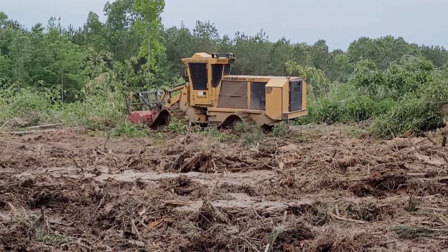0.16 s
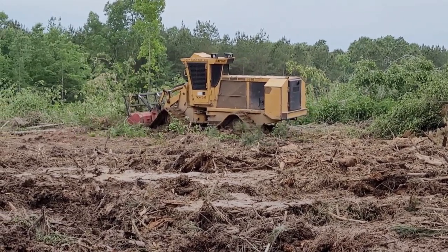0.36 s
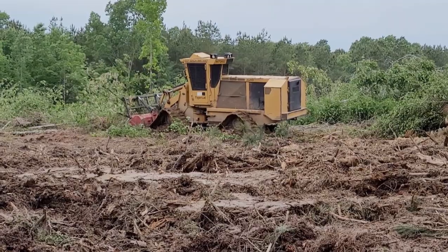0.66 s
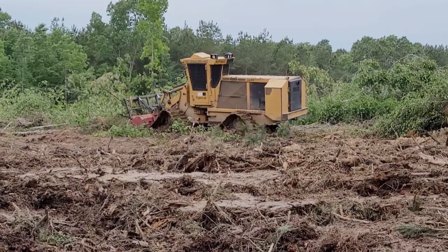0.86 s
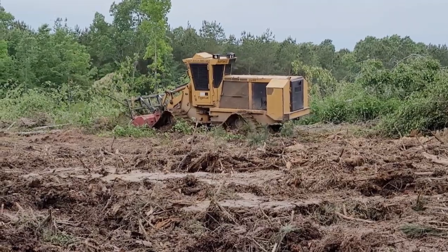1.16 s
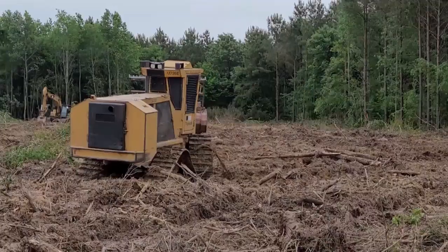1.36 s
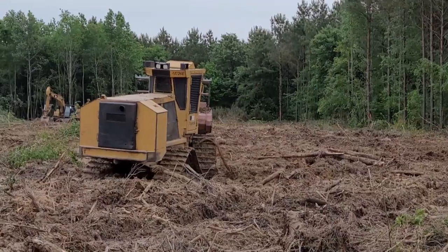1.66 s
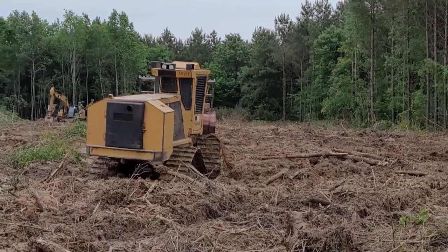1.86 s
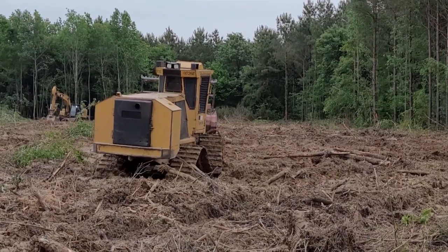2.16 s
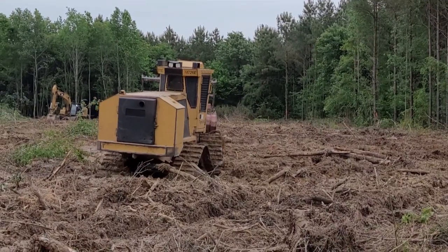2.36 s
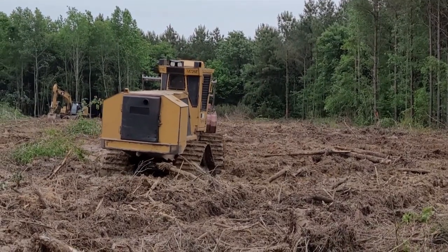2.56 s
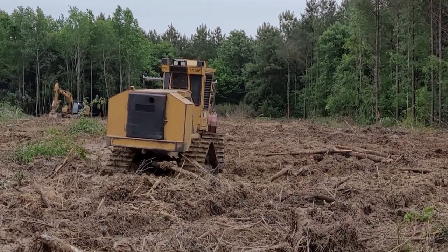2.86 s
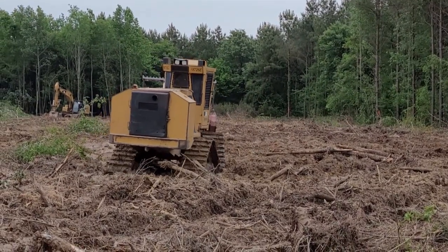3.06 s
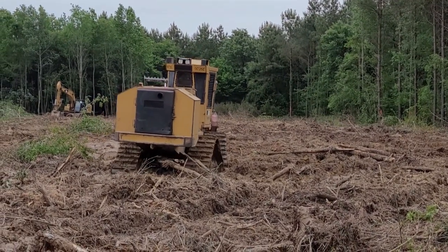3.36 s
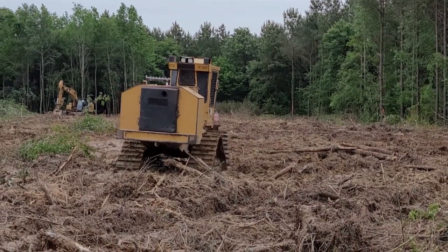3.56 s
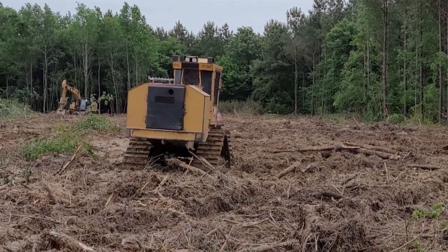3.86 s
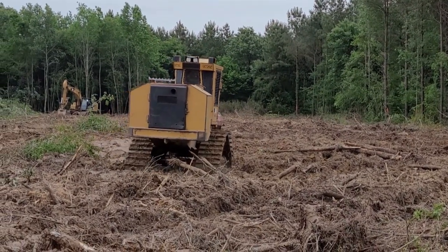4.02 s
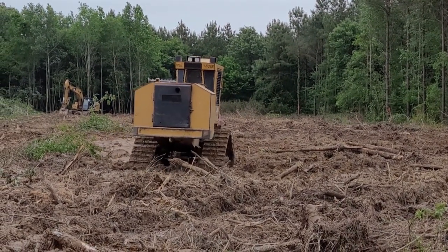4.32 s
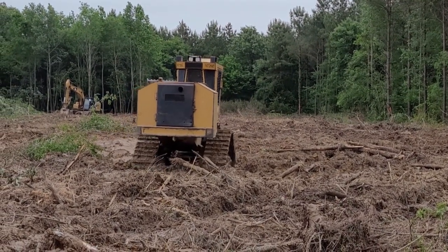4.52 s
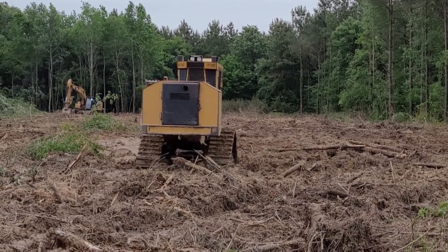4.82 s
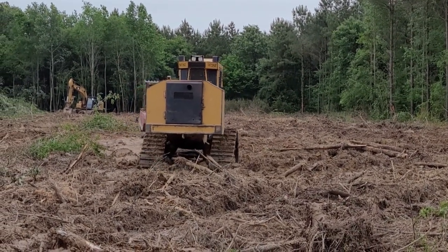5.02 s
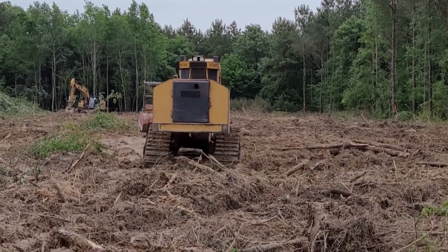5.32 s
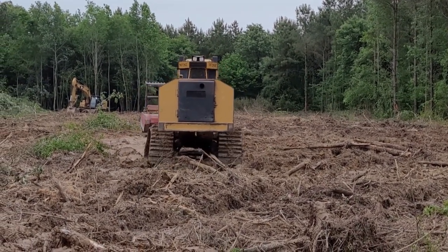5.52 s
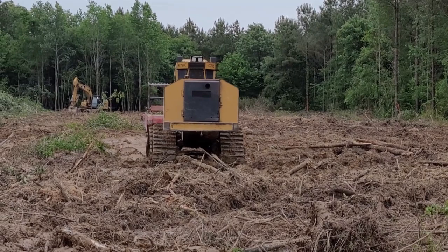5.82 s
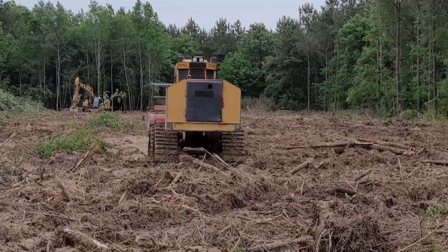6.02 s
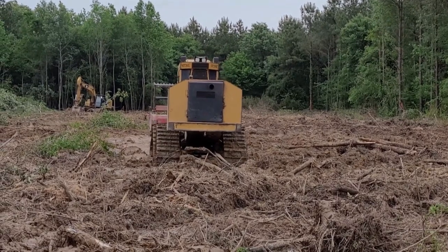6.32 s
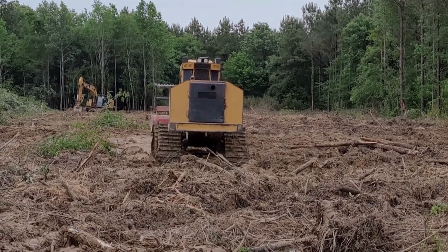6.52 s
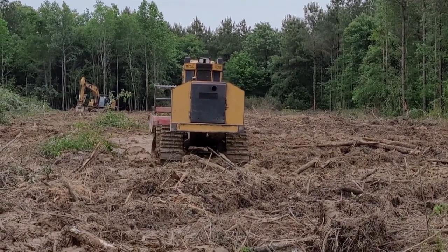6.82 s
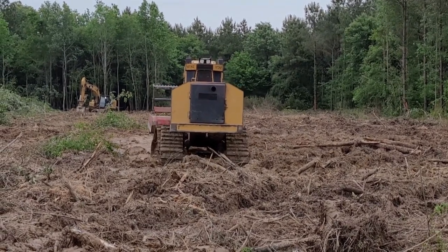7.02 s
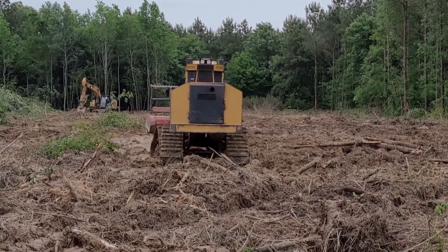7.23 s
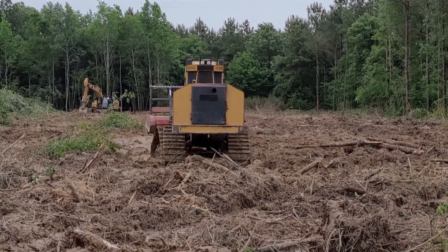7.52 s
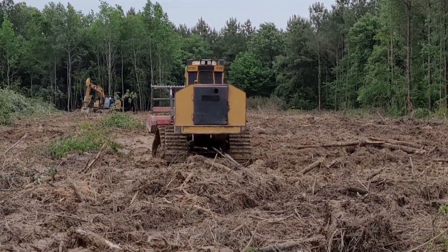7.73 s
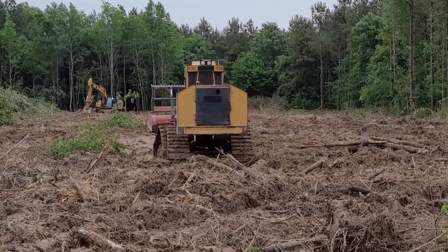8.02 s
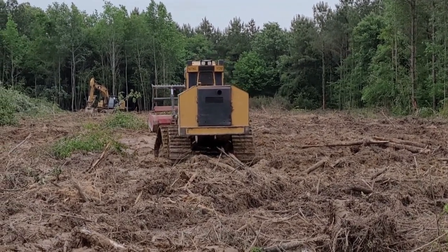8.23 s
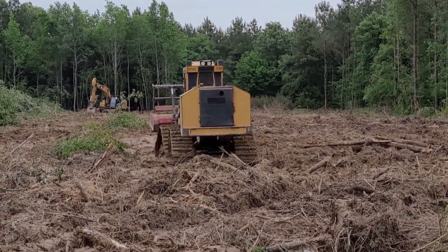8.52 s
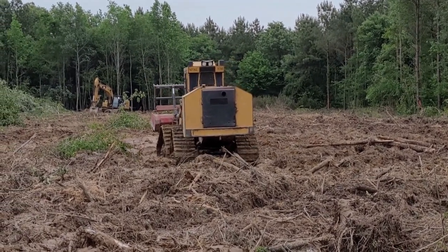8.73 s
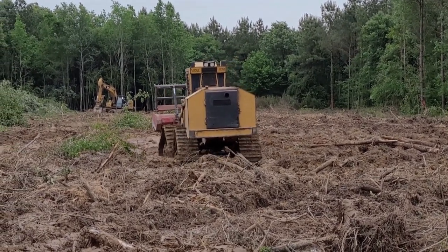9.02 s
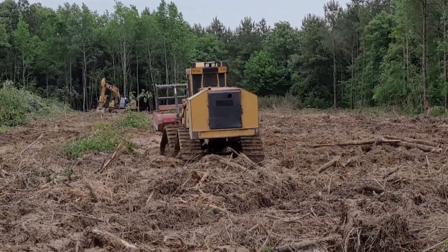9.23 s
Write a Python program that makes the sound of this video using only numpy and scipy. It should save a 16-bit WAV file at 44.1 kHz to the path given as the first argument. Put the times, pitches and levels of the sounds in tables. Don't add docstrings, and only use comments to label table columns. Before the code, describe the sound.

A diesel forestry machine rattles and knocks while its drum chews wood, cuts briefly to silence, then drones louder as it drives away over cleared ground.

```python
import sys
import numpy as np
from scipy import signal
from scipy.io import wavfile
from scipy.ndimage import uniform_filter1d

SR = 44100
rng = np.random.default_rng(int(sys.argv[2]) if len(sys.argv) > 2 else 0)


def to_wav(s):
    ch = np.atleast_2d(s).T
    pcm = np.round(np.clip(ch, -1, 1) * 32767)
    wavfile.write(sys.argv[1], SR, pcm.astype(np.int16))


def convert_level_to_amplitude(level_db):
    exponent = np.asarray(level_db, float) / 20
    return 10 ** exponent


N = 413658
TIME = np.arange(N) / SR

# [start/s, end/s]
VIEWS = [
    (0, 1.1794),
    (1.2562, 9.38),
]
# [t/s, firing rate/Hz, first order level/dB]
EXHAUST = [
    [(.05, 76.1, -19), (.2, 75.4, -19.5), (.36, 74.5, -17.6), (.7, 74.5, -16.9), (.95, 74.6, -17),
     (1.15, 75.5, -18)],
    [(1.3, 93.2, -9.9), (2.1, 93.1, -9.9), (3.4, 93.6, -9.1), (3.6, 93.3, -9.1), (4.0, 93.9, -9.2),
     (5.0, 94.0, -10.3), (5.5, 93.7, -9.8), (5.8, 94.5, -9.7), (6.0, 94.1, -10), (6.2, 92.5, -10.4),
     (6.6, 92.1, -10.6), (6.95, 92.5, -10.3), (7.15, 93.9, -9.6), (7.55, 92.7, -9.6), (7.8, 93.3, -8.7),
     (8.5, 93.8, -9.4), (9.3, 93.8, -9.8)],
]
# [t/s, blend/0-1]
AWAY = [(0, 0.5), (.15, 0.6), (.25, 0.15), (.42, 0.3), (.52, 1), (.85, 0.7), (.95, 0.1), (1.1, 0.5),
        (1.2, 0.5), (1.25, 0), (2.6, 0.12), (3.1, 0.17), (5, 0.26), (6.5, 0.38), (9.38, 0.41)]


def evened(x):
    return x / np.sqrt(np.mean(x ** 2) + 1e-20)


def read(points, hz):
    f, value = np.transpose(points)
    return np.interp(np.log(hz + 1), np.log(f + 1), value)


def columns(rows, t=TIME):
    s, *values = np.transpose(rows)
    return [np.interp(t, s, v) for v in values]


def wander(rate_hz):
    lowpass = signal.butter(2, rate_hz, fs=SR, output="sos")
    return evened(signal.sosfilt(lowpass, rng.standard_normal(N)))


def swells(rows):
    return sum(db * np.exp(-(2 * (TIME - s) / length) ** 2) for s, length, db in rows)


def fading(db, share, turn_db):
    start_m, speed_m_s = 8.36, 3.34
    turn_s, turn_length_s = 5.65, 0.72
    metres = start_m + speed_m_s * np.maximum(TIME - VIEWS[1][0], 0)
    turned = .5 + .5 * np.tanh(2 * (TIME - turn_s) / turn_length_s)
    return db - share * 20 * np.log10(metres / start_m) - turn_db * turned


def ports(view, hz):
    # [f/Hz, lead/rad]
    lead_rad = [
        [(30, .2), (130, .12), (400, 0), (1050, -.2), (1400, -.55), (3700, -.8), (4800, -1.3), (6500, -2.3),
         (9700, -4), (15500, -7)],
        [(30, .3), (130, .2), (500, .15), (750, 0), (1050, .2), (2800, .05), (3620, .6), (4200, -.4),
         (5900, -.4), (8100, 1.4), (9040, 0), (11600, .2), (13100, 1), (15300, 0)],
    ]
    # [f/Hz, difference/dB]
    tilt_db = [
        [(30, -1.2), (80, .2), (220, .5), (290, -1), (420, -.3), (560, 2), (750, 0), (1400, -.2), (2000, 1),
         (2700, .3), (3700, 1.9), (5100, -1.2), (9000, -2.6), (15000, -3)],
        [(30, -1.6), (80, .2), (200, .6), (290, -1.1), (420, 0), (750, .5), (1450, 1.3), (2700, 1.7),
         (3700, 2.7), (5100, -.4), (7000, -3.3), (9600, -1.2), (13000, .3)],
    ]
    half = convert_level_to_amplitude(read(tilt_db[view], hz) / 2) * np.exp(.5j * read(lead_rad[view], hz))
    return np.array([half, 1 / half])


def orders(table, turn, waver_db, fade_db=0):
    total = 0
    for multiple, db in table:
        level_db = db + waver_db * wander(4) - fade_db * (multiple - 2)
        phase = multiple * turn + .3 * wander(3) + 2 * np.pi * rng.random()
        total = total + convert_level_to_amplitude(level_db) * np.cos(phase)
    return total


def second_order(view):
    # [level/dB, loss per extra firing rate/(dB/Hz), drift/(dB/s)]
    second = [
        (-27, 0.27, -3.5),
        (-20, 0.66, -0.29),
    ]
    # [middle/s, length/s, change/dB]
    cancelled = [
        (.2, .35, 2.5),
        (1.07, .25, 3),
        (1.3, .3, -3),
        (5.5, 4.8, -3),
        (7.2, 0.22, -6),
    ]
    db, lug_db, drift_db = second[view]
    rate_hz = columns(EXHAUST[view])[0]
    lug = lug_db * (rate_hz - np.median(rate_hz))
    return db - lug + drift_db * (TIME - VIEWS[view][0]) + swells(cancelled)


def exhaust(view, turn):
    # [multiple of firing rate, level re first order/dB]
    uneven = [
        [(.667, -25), (1.333, -19), (2.333, -20), (2.5, -25), (3, -19.5), (5, -32), (5.333, -21), (5.667, -24),
         (6, -25), (6.333, -22), (7.333, -24)],
        [(.667, -28), (1.333, -24), (1.5, -28), (1.667, -22.5), (2.333, -28), (2.667, -35), (3, -40),
         (3.333, -32.5), (3.667, -28.5), (4, -27.5), (4.333, -31.5), (5.333, -28), (5.667, -33), (6, -31),
         (6.333, -30), (6.667, -30), (7, -32), (7.333, -32)],
    ]
    first_db = columns(EXHAUST[view])[1]
    second_db = second_order(view)
    away = view * columns(AWAY)[0]
    lag_rad = np.array([[.105], [-.085]])
    second_rad = (-1.4, 3.2)[view] - .5 * away
    first = convert_level_to_amplitude(first_db + .25 * wander(8)) * np.cos(turn + lag_rad)
    second = convert_level_to_amplitude(second_db + 1.1 + .5 * wander(8)) * np.cos(2 * turn + lag_rad + second_rad)
    low = [row for row in uneven[view] if row[0] <= 2]
    high = [row for row in uneven[view] if row[0] > 2]
    fade_db = 8 * np.maximum(away - .15, 0)
    lines = orders(low, turn, 1.5) + orders(high, turn, 2.3, fade_db)
    balance = convert_level_to_amplitude(np.array([[.1], [-.1]]))
    return np.sqrt(2) * balance * (first + second + convert_level_to_amplitude(first_db) * lines)


def roar(view, colours, patchy_db, from_hz=0, size=1024, sooner=1, ridge_db=2.5):
    # [f/Hz, likeness/0-1]
    likeness = [
        [(30, .78), (60, .9), (130, .95), (300, .96), (740, .94), (1400, .86), (2000, .86), (3700, .7),
         (5100, .45), (15000, .45)],
        [(30, .55), (60, .78), (130, .95), (290, .9), (550, .96), (1050, .9), (1450, .8), (2000, .88),
         (3700, .74), (7000, .5), (13000, .38)],
    ]
    # [f/Hz, width/Hz, level over surround/dB]
    panels = [
        [(1225, 78, -2), (2180, 90, -1.5), (2600, 80, -6), (3230, 91, 3), (3684, 86, 9.5), (4600, 100, -1),
         (8390, 100, -1)],
        [(1084, 330, 2), (1185, 76, 5), (1760, 57, 0.5), (2140, 58, -3), (2293, 81, 5.5), (2430, 29, 2.5),
         (2527, 106, -8), (3280, 240, 0.5), (3800, 100, -4), (3970, 120, 5), (4350, 89, 3.5), (4670, 90, 5),
         (4800, 150, -2), (5160, 110, 4), (5300, 160, -3), (5690, 160, 1.5), (8060, 170, 1)],
    ]
    hop = size // 4
    frames = N // hop + 5
    hz = np.fft.rfftfreq(size, 1 / SR)
    a, b, c, d, patches, streaks = rng.standard_normal((frames, len(hz), 6)).T
    patches = uniform_filter1d(patches, size=8, axis=0)
    patches = evened(uniform_filter1d(patches, size=10, axis=1))
    streaks = evened(uniform_filter1d(streaks, size=40, axis=1))

    away = columns(AWAY, np.arange(frames) * size / 4 / SR)[0]
    away = np.clip(sooner ** view * away, 0, 1)
    pair = colours[-2:] if view else (colours[0], colours[-3])
    ring_db = sum(db / (1 + (2 * (hz - f) / width) ** 2) for f, width, db in panels[view])
    close, far = (convert_level_to_amplitude(read(colour, hz) + ring_db)[:, None] for colour in pair)
    band = hz > from_hz
    shape = (1 - away) * close / np.linalg.norm(close[band])
    shape = shape + away * far / np.linalg.norm(far[band])

    same = np.clip(read(likeness[view], hz), 0, 1)[:, None]
    common = np.sqrt((1 + same) / 2) * (a + 1j * b)
    apart = np.sqrt((1 - same) / 2) * (c + 1j * d)
    z = np.array([common + apart, common - apart]) * ports(view, hz)[..., None]
    z = z * shape * convert_level_to_amplitude(patchy_db * patches + ridge_db * streaks)
    mono = z.mean(0)
    share = np.linalg.norm(mono[band]) / np.linalg.norm(mono)
    sound = signal.istft(z, nperseg=size, noverlap=size - hop)[1][:, :N]
    return sound / (share * np.sqrt(np.mean(sound.mean(0) ** 2)))


def effort(view):
    # [level/dB, gain with brush in the drum/dB, unsteadiness/dB]
    side_levels = [
        (-31, -0.5, 0),
        (-21.5, -0.2, 0.5),
        (-16, -0.44, 0.3),
        (-31.5, 2.5, 0.3),
    ]
    # [start level/dB, share of distance loss, loss in the turn/dB, unsteadiness/dB]
    rear_levels = [
        (-28.5, 0.78, -1, 1.2),
        (-17, 1, 4, 0.3),
        (-22.5, 0.8, -0.5, -0.64),
        (-39.5, 0.22, 3, -0.5),
    ]
    # [middle/s, length/s, change/dB]
    thumps = [(.1, 0.23, -2.5), (5.25, 0.57, 3.5), (7.15, 0.17, -3), (8.36, 0.22, 1.5), (1.5, 0.15, 1),
              (3, 0.25, 2)]
    surges = [(.45, 0.058, 2.5), (.63, 0.073, 5), (.93, 0.18, 1.5), (1.46, 0.25, -1.5), (2.07, 0.17, 2),
              (2.9, 0.37, 0.5), (3.69, 0.5, 1.5), (4.3, 0.23, -1.5), (3.05, 0.24, -1), (3.95, .2, -0.5),
              (4.65, 0.14, 1), (5.15, 0.18, 2), (4.9, 0.74, 2), (5.45, 0.33, 2), (7.3, 1, 4),
              (7.8, 0.32, 2), (8.36, 0.58, 2.5)]
    bites = [(.0, 0.068, -2), (.56, 0.16, 0.5), (1.05, 1, 0.5), (2.9, 0.15, 0), (3.7, 0.14, 1),
             (4.75, 0.41, 1), (6.5, 0.38, 0.8), (8.7, 1, 2.5)]
    sprays = [(.08, .15, 2.5), (.58, .1, 1), (.8, .15, 0.5), (1.1, 0.093, -1)]
    if view:
        levels = [fading(*row) + shake_db * wander(4.0) for *row, shake_db in rear_levels]
    else:
        brush = columns(AWAY)[0]
        levels = [db + brush_db * brush + shake_db * wander(8.7) for db, brush_db, shake_db in side_levels]
    rumble_db, fan_db, knock_db, rush_db = levels
    biting_db = swells(bites)
    rush_db = rush_db + .9 * biting_db + swells(sprays)
    return rumble_db + swells(thumps), fan_db + swells(surges), knock_db + biting_db, rush_db


def teeth():
    # [t/s, peak level/dB]
    strikes = [(0.0199, -6), (0.0573, -6), (0.2578, -5), (0.2952, -6), (0.3212, -3), (0.3471, -2),
               (0.6549, -3), (0.7113, -1), (0.7517, -9), (0.7776, -5), (0.8839, -5), (0.9258, -5),
               (1.0181, -5), (1.0994, -2), (1.1069, -4), (1.1508, -11)]
    level_db, t60_s = -10, .012
    out, t = np.zeros(N), np.arange(800) / SR
    for s, db in strikes:
        out[round(s * SR):][:800] += convert_level_to_amplitude(db + level_db - 60 * t / t60_s) * rng.standard_normal(800)
    return signal.sosfilt(signal.butter(2, (1200, 4500), "band", fs=SR, output="sos"), out)


def ticks():
    # [t/s, peak level/dB]
    tick_rows = [(1.2563, -24), (7.955, -23), (4.903, -33), (.032, -26), (.071, -26), (.11, -27), (.58, -27),
                 (.59, -27), (.711, -27), (.855, -27), (1.1, -27)]
    out, t = np.zeros(N), np.arange(600) / SR
    decay = convert_level_to_amplitude(-60 * t / .002) + 0.29 * convert_level_to_amplitude(-60 * t / .03)
    for s, db in tick_rows:
        out[round(s * SR):][:600] = convert_level_to_amplitude(db) * decay * rng.standard_normal(600)
    return signal.sosfilt(signal.butter(2, (3500, 13000), "band", fs=SR, output="sos"), out)


def stump():
    middle_s, length_s, hum_hz, level_db = 0.98, 0.078, 257, -21.5
    swell = np.exp(-(2 * (TIME - middle_s) / length_s) ** 2)
    return convert_level_to_amplitude(level_db) * swell * np.cos(2 * np.pi * hum_hz * TIME)


def bangs():
    # [t/s, peak level/dB, ring f/Hz]
    hits = [(1.2558, -10, 640), (1.326, -9, 654), (1.48, -8, 697), (1.549, -6, 694), (1.579, -10, 606),
            (1.629, -9, 643), (1.68, -11, 713), (1.717, -8, 651), (1.773, -11, 686), (1.815, -8, 668),
            (1.923, -10, 633), (1.989, -10, 633), (2.032, -7, 678), (2.137, -9, 670), (2.226, -12, 694),
            (2.308, -7, 657), (2.429, -10, 689), (2.479, -10, 606), (2.588, -13, 568), (2.632, -11, 686),
            (2.7, -9, 684), (2.859, -7, 595), (2.929, -9, 595), (3.036, -10, 713), (3.11, -11, 692),
            (3.448, -10, 668), (3.531, -12, 697), (3.617, -13, 611), (3.647, -7, 692), (3.874, -12, 635),
            (3.929, -9, 603), (3.958, -12, 616), (4.346, -13, 689), (4.414, -16, 592), (4.49, -13, 641),
            (4.733, -12, 703), (4.797, -14, 552), (5.062, -15, 735), (5.14, -12, 627), (5.171, -14, 608),
            (5.345, -12, 673), (5.403, -12, 641), (5.485, -13, 657), (5.536, -17, 654), (5.683, -18, 697),
            (5.955, -17, 689), (6.604, -18, 681), (6.91, -16, 654), (6.979, -19, 557), (7.315, -16, 622),
            (7.39, -17, 659), (7.424, -18, 684), (7.704, -18, 638), (7.861, -19, 662), (8.113, -19, 649),
            (8.218, -18, 581), (9.049, -23, 729), (9.142, -23, 694)]
    level_db, peak_s, hush = -1, .003, .86
    out, room, t = np.zeros(N), np.ones(N), np.arange(1500) / SR
    dip = 1 - hush * np.hanning(1000) ** .5
    swing = t / peak_s * np.exp(1 - t / peak_s)
    for s, db, hz in hits:
        at = round(s * SR)
        ring = np.sin(2 * np.pi * (hz * t + rng.random()))
        out[at:][:1500] += convert_level_to_amplitude(db + level_db) * swing * ring
        room[at - 450:at + 550] *= dip
    return out, room


def whine(rows, width_hz, flutter_db, steady=0):
    hz, db = columns(rows)
    turn = 2 * np.pi * np.cumsum(hz) / SR
    fuzz = wander(width_hz) * np.cos(turn) + wander(width_hz) * np.sin(turn)
    tone = np.sqrt(1 - steady) * fuzz + np.sqrt(2 * steady) * np.cos(turn)
    return convert_level_to_amplitude(db + flutter_db * wander(1.9)) * tone * abs(ports(1, hz.mean()))[:, None]


def drives(turn):
    # [multiple of firing rate, level/dB]
    gears = [(53 / 3, 1), (21.38, -9), (13.5, -7)]
    pump = [(7.39, 0), (14.78, -17)]
    overtone = [(22.17, 1)]
    # [start level/dB, share of distance loss, loss in the turn/dB]
    drive_levels = [
        (-46, 0.17, 2.5),
        (-32, 0.37, 1),
        (-45, 0.25, 3),
    ]
    # [middle/s, length/s, change/dB]
    pulls = [(1.95, 0.83, 7.8), (3.15, 0.55, 8.8), (4.4, 0.86, 7.7), (5.0, .2, 4.1), (5.9, 1, 4.8),
             (8.1, 1.6, 11)]
    # [middle/s, length/s, change/dB]
    pumping = [
        (5.78, .45, 5),
        (8.8, 1.2, -3),
    ]
    # [t/s, f/Hz, level/dB]
    turbo = [(1.26, 11950, -47), (1.6, 11945, -51), (3, 11930, -54), (5, 11900, -60), (6.1, 11830, -63),
             (6.9, 11940, -65), (9.38, 11940, -65)]
    # [t/s, f/Hz, level/dB]
    grille = [
        [(1.26, 3390, -37), (2.4, 3427, -35.5), (3.2, 3420, -45), (5.5, 3440, -43), (6.5, 3500, -71)],
        [(1.8, 3240, -53), (2.6, 3230, -39), (4.2, 3183, -42.5), (5.7, 3230, -42), (6.5, 3185, -56)],
        [(1.4, 9100, -69), (1.7, 9300, -59), (2.4, 9120, -57), (2.8, 9170, -62)],
    ]
    gear_db, pump_db, overtone_db = (fading(*row) for row in drive_levels)
    locked = convert_level_to_amplitude(gear_db + swells(pulls)) * orders(gears, turn, 2.2)
    locked = locked + convert_level_to_amplitude(pump_db + swells(pumping)) * orders(pump, turn, 2.2)
    locked = locked + convert_level_to_amplitude(overtone_db) * orders(overtone, turn, 2.2)
    whistle = 1.3 * whine(turbo, 40, 1.2, steady=.55)
    return np.sqrt(2) * locked + whistle + sum(whine(rows, 60, 1.5) for rows in grille)


def machine(view):
    # [f/Hz, density/dB per Hz]
    rumble_colours = [
        [(15, -33), (20, -24), (35, -6), (60, -6), (85, 1), (120, -6), (170, -6), (260, -5), (300, -6.5),
         (350, -16), (410, -1.5), (460, -22), (600, -40), (1000, -120)],
        [(15, -39), (20, -25), (35, -14), (65, -3.5), (85, -0.5), (110, -6.5), (170, -4.5), (245, -6),
         (285, -12.5), (460, -12.5), (600, -50), (1000, -120)],
        [(15, -37), (20, -12), (35, -16), (65, -2.5), (85, 3.5), (110, -2), (170, -4.5), (235, -15.5),
         (285, -23), (460, -16.5), (600, -36), (1000, -120)],
    ]
    fan_colours = [
        [(270, -32), (460, -10), (504, -6), (575, -9.5), (672, 1.5), (745, 1), (785, -1.5), (860, -32),
         (1120, -45), (1890, -120)],
        [(270, -41), (460, -26), (482, -13), (573, 5.5), (669, 8.5), (760, 0), (818, -35), (860, -10),
         (1120, -29), (1890, -120)],
        [(270, -30), (460, -23), (480, -24), (504, 7.5), (595, -12), (662, -7), (747, 1.5), (860, -22),
         (1120, -39), (1890, -120)],
    ]
    knock_colours = [
        [(510, -40), (860, -12.5), (1190, 2), (1380, -4), (1870, 0.5), (2130, -5), (2310, 0.5), (2560, -8),
         (2790, -4.5), (3010, -11.5), (3220, -7), (3470, -11.5), (3750, -15.5), (4050, -11.5), (6500, -23.5),
         (8450, -48), (14300, -120)],
        [(510, -46), (860, -7.5), (1050, -1.5), (1220, -6), (1570, -13), (1690, -7.5), (2090, -10.5),
         (2280, -5.5), (2560, -14.5), (3330, -7.5), (3720, -12.5), (3980, -14.5), (4870, -18.5), (5680, -16.5),
         (6500, -25), (8450, -64), (14300, -120)],
        [(510, -28), (860, -17), (1130, -4.5), (1270, -2.5), (1370, -3), (1560, 2), (1600, -7), (1690, 3),
         (1890, 0), (2310, -6), (2540, -3), (3330, -10), (3780, -16.5), (4080, -21), (6500, -19), (8450, -65),
         (14300, -120)],
    ]
    rush_colours = [
        [(3820, -32), (6500, -5), (7440, 0.5), (8220, 1.5), (9200, 2), (10900, -2.5), (13300, -12),
         (15100, -17), (15600, -15)],
        [(3820, -30), (6500, -8), (8160, 0.5), (8650, 0), (9170, -7), (9870, -0.5), (10900, 1), (12400, -3),
         (15600, -20)],
        [(3820, -31), (6500, -8), (7050, 0.5), (8800, 4), (9650, -1.5), (11300, -1.5), (12600, -2), (13800, -7),
         (15600, -12)],
        [(3820, -34), (6500, -1.5), (8550, 3), (10600, -10.5), (12200, -11), (12600, -12), (15600, -21)],
    ]
    throb = [
        (.1, 0.2, 0.21, 0.19),
        (.2, 0.09, 0.05, 0.025),
    ]
    throb_rad = [
        (2.4, 2.3, 2.6, 3.0),
        (-1.2, 2.0, 1.9, 1.9),
    ]
    turn = 2 * np.pi * np.cumsum(columns(EXHAUST[view])[0]) / SR + 1.9 * view
    ring, room = bangs()
    rumble = roar(view, rumble_colours, .8, from_hz=230, size=8192, ridge_db=1.4)
    fan = room * roar(view, fan_colours, 0.3, ridge_db=1.15)
    knock = roar(view, knock_colours, (.5, .94)[view], ridge_db=(1.5, 2.4)[view])
    rush = roar(view, rush_colours, 1.2, sooner=1.25)
    layers = rumble, fan, knock, rush
    cylinders = 1 + 0.24 * np.cos(turn / 3)
    sound = exhaust(view, turn) + ring + ticks()
    for layer, db, depth, at in zip(layers, effort(view), throb[view], throb_rad[view]):
        sound = sound + convert_level_to_amplitude(db) * layer * (1 + depth * cylinders * np.cos(turn + at))
    if view:
        return sound + drives(turn)
    return sound + stump() + teeth()


def scene():
    edge_s = .0001
    total = np.zeros((2, N))
    for view, (start_s, end_s) in enumerate(VIEWS):
        since_s = TIME - start_s + (view == 0)
        left_s = end_s - TIME + view
        total += machine(view) * np.clip(np.minimum(since_s, left_s) / edge_s, 0, 1)
    return total


def thinned(x, from_hz, odds):
    hz, t, z = signal.stft(x, SR, nperseg=1024)
    gone = evened(uniform_filter1d(rng.standard_normal(len(t)), size=5)) > odds
    kept = ~((hz > from_hz)[:, None] & gone)
    return signal.istft(z * kept, SR, nperseg=1024)[1][:, :N]


def band_limit(x):
    return signal.sosfilt(signal.butter(12, 15740, fs=SR, output="sos"), x)


def record(dry):
    knee, headroom = .75, .24
    over = np.maximum(abs(dry) - knee, 0)
    held = dry - np.sign(dry) * (over - headroom * np.tanh(over / headroom))
    held = thinned(held, 15200, .25)
    held = thinned(held, 14400, 1.3)
    return band_limit(held)


dry = scene()
out = record(dry)
to_wav(out)
```